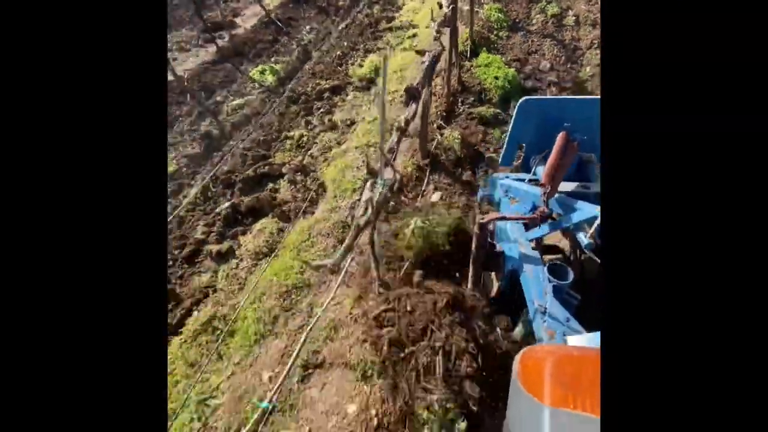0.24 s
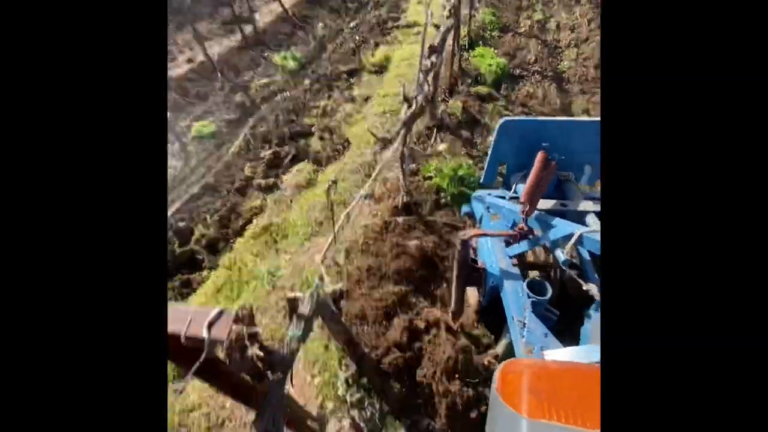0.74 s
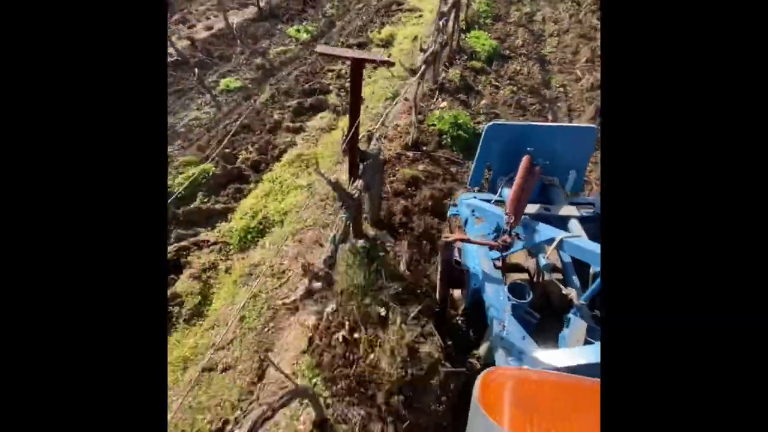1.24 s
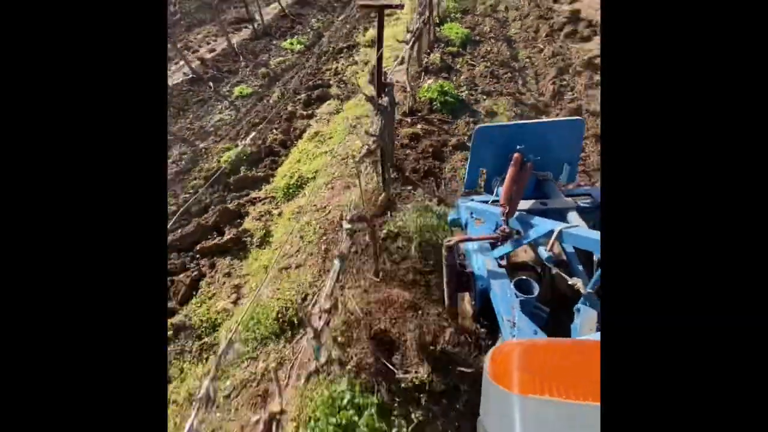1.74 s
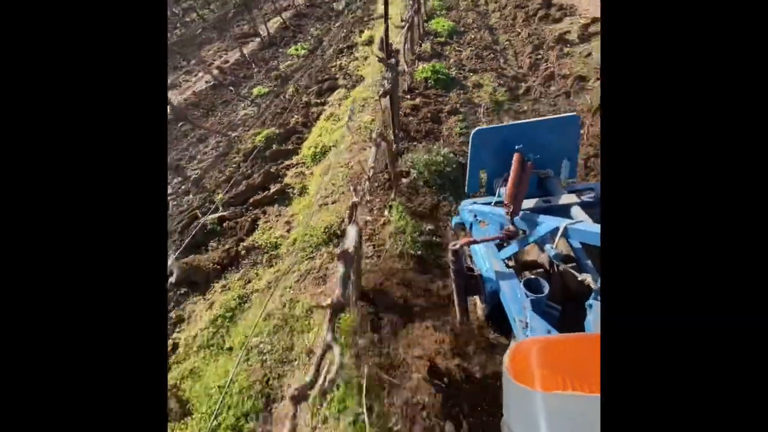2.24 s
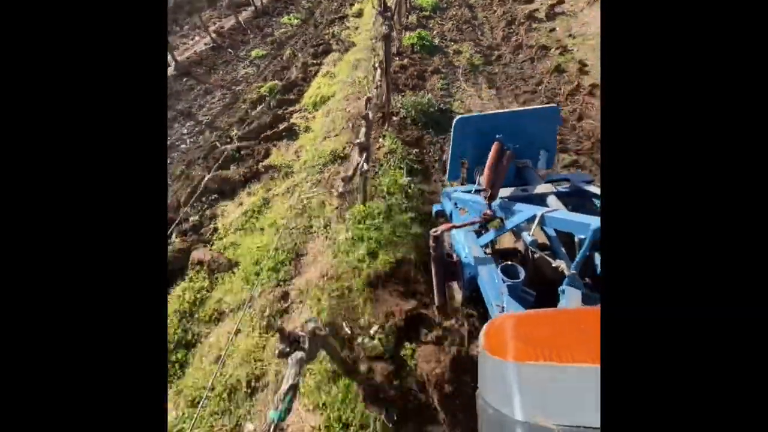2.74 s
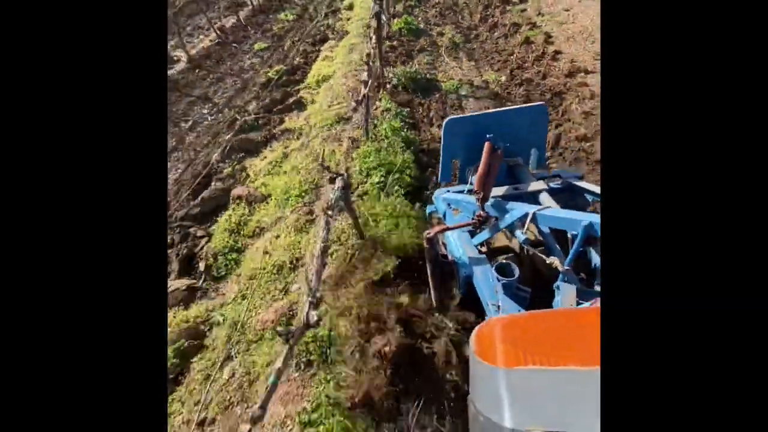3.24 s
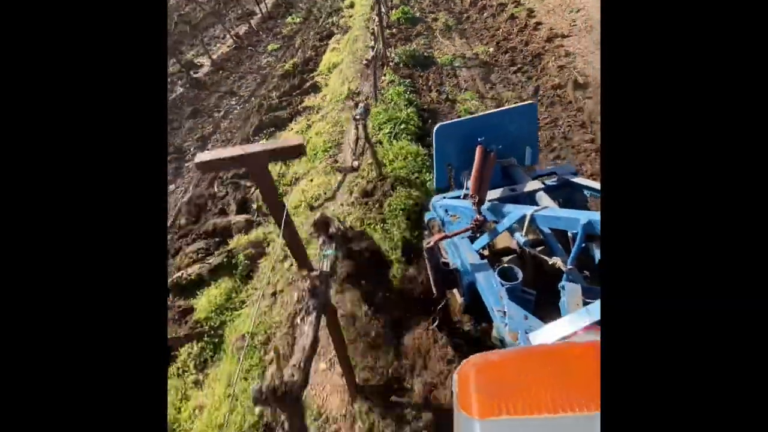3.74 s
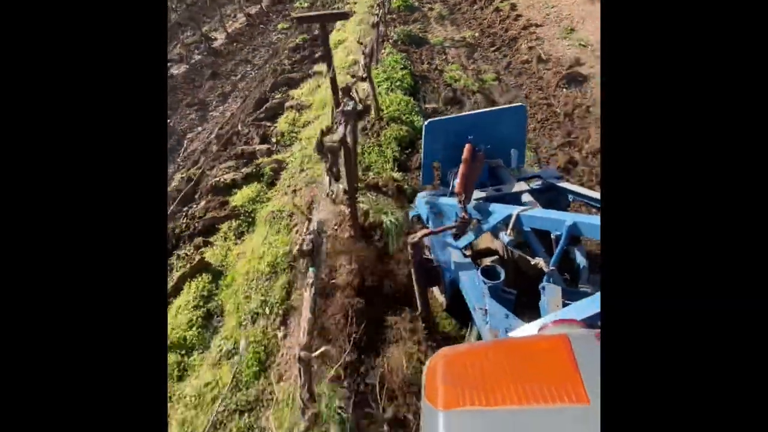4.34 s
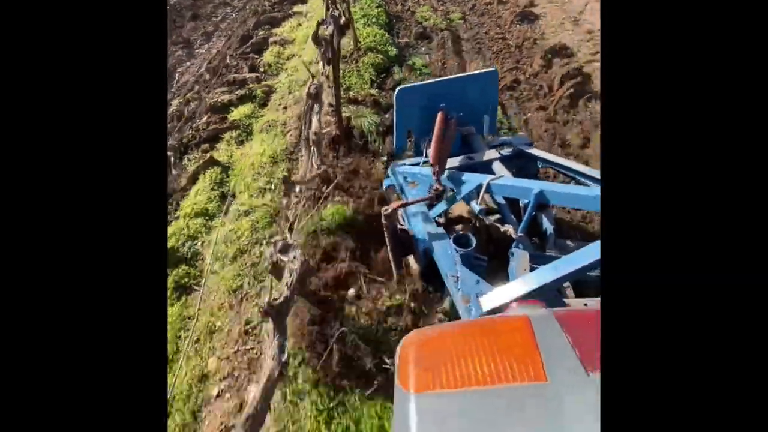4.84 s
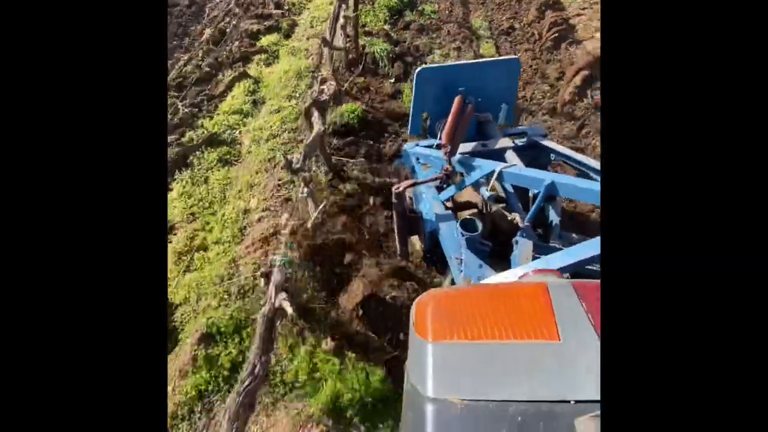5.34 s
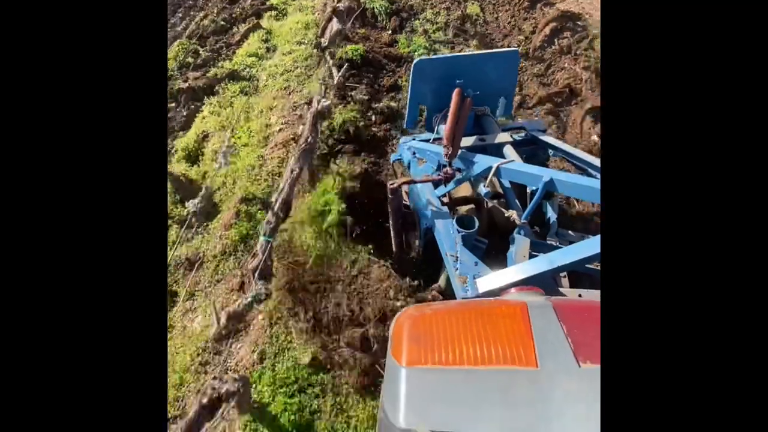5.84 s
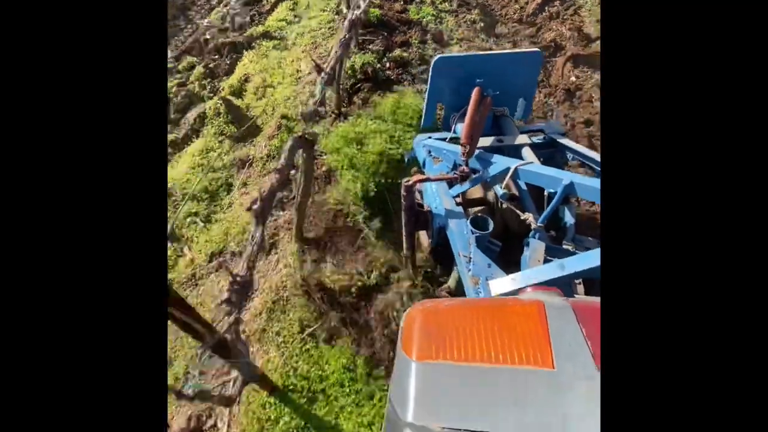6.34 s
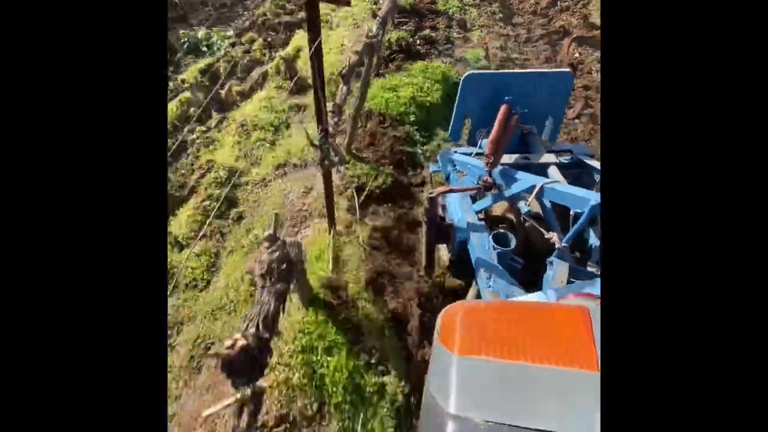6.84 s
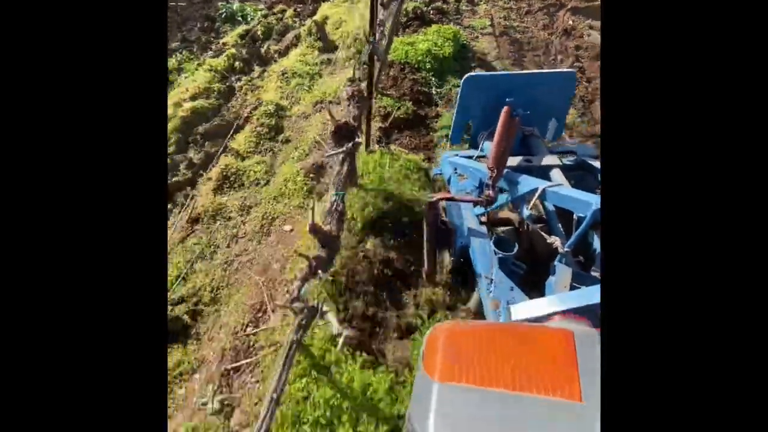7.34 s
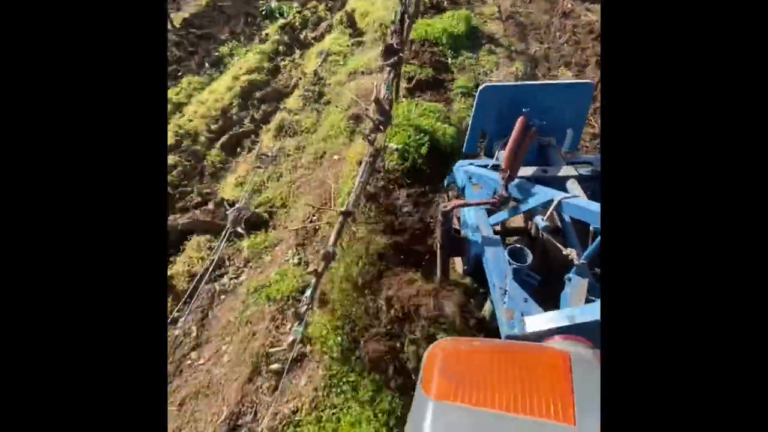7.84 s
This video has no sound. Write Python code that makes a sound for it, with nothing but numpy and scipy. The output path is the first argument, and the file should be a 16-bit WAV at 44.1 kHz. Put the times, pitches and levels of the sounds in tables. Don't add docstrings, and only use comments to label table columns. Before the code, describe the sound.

A diesel tractor engine runs at a nearly constant working speed for about eight seconds, close and loud from the seat, outdoors: a deep throbbing firing tone, exhaust rumble, bonnet roar, clatter and thin gear whine. Soil hisses softly over the discs, with scattered gritty clods throughout. Stones tap from 1.0 to 1.5 s; a low creak follows at 1.7 s. High whistles with oil spurts come at 2.0 and, sharper, 2.5 s. Small knocks and creaks cluster at 3.0 s. Around 4.0 s hard clanks meet a strong squeal, then oil sputters to about 4.5 s. Near 4.8 s the hand-held phone turns, shifting the stereo image, and the engine grows brighter and more forward. Squeaks and oil hiss return at 5.2 to 5.6 s, stones clank at 6.0 s, a faint whistle and spurt sound at 7.6 s, and bright steel knocks close at 8.0 s.

```python
import sys
import numpy as np
from scipy import signal
from scipy.fft import rfft, irfft, next_fast_len
from scipy.io import wavfile
from scipy.ndimage import uniform_filter1d, map_coordinates

SR = 44100
rng = np.random.default_rng(int(sys.argv[2]) if len(sys.argv) > 2 else 0)


def digitize_waveform(pressure):
    field = np.atleast_2d(pressure).T
    bounded = np.clip(field, -1, 1)
    quanta = np.round(bounded * 32767).astype(np.int16)
    wavfile.write(sys.argv[1], SR, quanta)


def gain_from_db(level_db):
    decades = np.asarray(level_db, float) / 20
    return 10 ** decades


N = 356006

# (time [s], frequency [Hz])
SHAFT_HZ = [(0.0, 21.48), (0.5, 21.48), (1.15, 21.42), (1.5, 21.54), (2.0, 21.47), (3.0, 21.37),
            (3.25, 21.27), (3.5, 21.43), (3.75, 21.47), (4.1, 21.34), (4.5, 21.41), (4.75, 21.64),
            (5.4, 21.82), (5.75, 21.71), (6.9, 21.72), (7.4, 21.86), (7.75, 21.84), (8.07, 21.72)]
# (multiple of shaft line [1], level [dB])
ORDER_LEVELS_DB = [(2, -17), (3, 1), (4, -14), (5, -18), (6, -12.5), (7, -9), (8, -19), (9, -15), (10, -20),
                   (11, -24), (12, -12.5), (13, -20), (15, -14), (16, -26), (17, -22), (18, -16), (19, -23),
                   (21, -18), (24, -19), (25, -21), (26, -15.5), (27, -21), (30, -13.5), (32, -24),
                   (33, -27), (36, -28), (38, -23), (39, -27), (42, -27), (44, -28), (45, -20), (52, -27),
                   (60, -23.5)]
# (multiple of shaft line [1], level [dB])
GEAR_LEVELS_DB = [(14.3, -20), (75, -28.5), (84, -29), (90, -23.5), (119.5, -31)]
# (level [dB], gain when faced [dB], gain under load [dB], gain just after the turn [dB])
LAYERS_DB = [
    (-18.5, 1.1, -2, 2),
    (-23.5, 0, 0.73, 0.5),
    (-23.5, 1.03, 1.36, 4.5),
    (-30.5, 3.5, -0.93, 2.5),
]
# (time [s], share [0-1])
DISC_LOAD = [(0, 0.5), (1.0, 0.1), (2.2, 0.78), (3.0, 1), (4.0, 0.16), (8.07, 0.56)]
# (time [s], share [0-1])
FACING = [(0, 0.3), (3.5, 0.4), (4.5, 0.43), (5.0, 0.14), (6.0, 1), (7.0, 0.77), (8.07, 1)]
# (time [s], extra lead near 600 Hz [rad])
WRIST_SWING_RAD = [(4.8, -0.91), (5.35, -0.05), (5.7, 0.25), (7, 0.42), (8.07, 0.78)]
# (frequency [Hz], density [dB per Hz])
RUMBLE_DB = [(25, -52), (45, -17), (80, -8), (140, -5.5), (250, -10), (330, -30), (600, -50)]
# (frequency [Hz], density [dB per Hz])
BODY_DB = [(150, -62), (290, -0.5), (560, 0.5), (700, -3), (950, -3), (1100, -15), (2000, -85)]
# (frequency [Hz], density [dB per Hz])
CLATTER_DB = [(600, -33), (1050, 1), (1300, 2), (1900, 0.5), (2400, -4.5), (3500, -9.5), (4300, -14.5),
              (7400, -46), (12000, -33)]
# (time [s], length [s], level [dB], steel pitch [Hz], share that rings [0-1])
STONES = [(0.52, 0.0043, -31, 3850, 0.3), (1.006, 0.014, -21.5, 1900, 0.4),
          (1.052, .005, -17.5, 1435, 0.37), (1.233, .0031, -21, 1910, 0.1),
          (1.427, 0.0085, -17, 1800, 0.27), (1.487, 0.0038, -22, 3300, 0.36),
          (2.236, 0.012, -19.5, 3300, 0.2), (3.016, .008, -22, 2800, 0.5), (3.049, .012, -20.5, 3260, 0.24),
          (3.062, .008, -21, 2980, 0.36), (3.9815, 0.0023, -11.5, 2254, 1), (3.982, 0.00194, -21, 2780, .8),
          (3.98, 0.0021, -10, 1400, 0.35), (4.098, .003, -17, 2230, 0.5), (4.124, .008, -22, 2280, 0.7),
          (4.137, 0.00415, -21, 2670, 0.7), (4.148, .003, -16, 2340, 0.6), (4.775, 0.0046, -18, 2210, 0.2),
          (4.786, 0.0059, -20, 1940, 0.26), (4.793, 0.0055, -15.5, 4000, 0.1),
          (4.919, 0.0046, -18.5, 1590, .45), (5.226, 0.002, -24, 1900, 0.1), (5.905, 0.014, -22, 1957, 0.6),
          (6.001, 0.0011, -14.5, 1570, 0.6), (6.045, .004, -26, 1850, .3),
          (6.053, 0.0069, -12.5, 2000, 0.74), (6.049, .004, -16, 4200, 0.47), (6.054, .004, -19, 3740, .6),
          (6.049, 0.0041, -17, 6230, 0.5), (6.097, 0.0066, -19, 1940, 0.5), (6.219, 0.0044, -26, 4000, .1),
          (6.662, 0.0054, -22.5, 1310, 0.63), (7.128, .004, -18, 1486, 0.35),
          (7.293, 0.0085, -26, 1880, 0.9), (7.342, .005, -20, 1323, 0.4), (7.489, .013, -20, 1640, 0.37),
          (7.988, .004, -24, 3800, 0.1), (8.009, .003, -25, 3400, .2), (8.015, .003, -19, 1480, .7),
          (8.017, 0.002, -10, 3850, 0.3), (8.019, 0.0053, -8, 3480, 0.84)]
# (time [s], length [s], level [dB])
CLODS = [(0.157, 0.0032, -23), (0.282, 0.0038, -27.5), (0.366, 0.0078, -31), (0.52, 0.0039, -25.5),
         (0.687, 0.0032, -32), (0.816, 0.0042, -25), (1.202, 0.0033, -31), (1.228, .0015, -28),
         (1.243, 0.004, -27.5), (1.443, 0.0026, -36), (1.832, 0.003, -24.5), (1.998, 0.0075, -33),
         (2.063, 0.0073, -38), (2.162, 0.005, -30), (2.386, 0.0034, -41), (2.52, 0.0083, -26),
         (2.543, .015, -36), (3.018, 0.0061, -34), (3.037, 0.002, -25), (3.744, 0.009, -29.5),
         (4.034, 0.0027, -27), (4.117, 0.022, -33), (4.351, 0.012, -32), (4.553, .003, -29),
         (4.791, 0.012, -35), (4.994, 0.0029, -30), (5.335, .012, -33), (5.391, 0.0071, -25.5),
         (5.468, 0.0062, -31), (5.55, .0045, -31), (6.097, 0.0025, -22.5), (6.587, 0.004, -33),
         (7.34, 0.0073, -35), (7.475, 0.0068, -34), (7.49, .005, -36), (7.544, .002, -29),
         (8.016, 0.015, -25.5)]
# (frequency [Hz], density [dB per Hz])
GRIT_DB = [(2500, -25), (4500, 0), (9000, -1), (13000, -3), (15800, -7)]
# (centre [s], length [s], pitch [Hz], level [dB], overtone [dB])
WHISTLES = [(2.009, 0.016, 5010, -29, 2), (2.028, .035, 4800, -29, -4), (2.071, 0.022, 4720, -18, -14),
            (2.09, .015, 4750, -37, -20), (2.511, 0.02, 4800, -12.5, -9), (2.546, .012, 4670, -23, -12),
            (2.565, .02, 4660, -37, -15), (4.273, 0.023, 5050, -25, -8), (4.303, 0.03, 4980, -30, -14),
            (4.33, 0.021, 5010, -29, -18), (4.38, .02, 4980, -36, -15), (5.203, 0.025, 5030, -28, -1),
            (5.228, .018, 4920, -23, -3), (5.248, .02, 4940, -36, -12), (7.568, 0.022, 4880, -29, -8),
            (7.586, 0.016, 4760, -25, -3)]
# (centre [s], length [s], pitch [Hz], level [dB], overtone [dB])
SQUEALS = [(0.886, 0.015, 3880, -22.5, -3), (0.915, 0.019, 3850, -25, -16), (2.258, 0.025, 3930, -34, -2),
           (2.314, .06, 3920, -40, -14), (3.794, 0.022, 3870, -29, -4), (3.824, 0.02, 3900, -25.5, -11),
           (4.03, 0.024, 3870, -13.5, -14), (4.02, 0.059, 3830, -23, -9), (4.904, .07, 3920, -42, -6),
           (5.53, .016, 3900, -29, 0), (5.549, 0.035, 3863, -20.5, -2), (5.561, 0.033, 3870, -27, 12),
           (5.586, 0.025, 3864, -17, -8), (5.615, 0.022, 3850, -36, -12), (7.792, 0.04, 3880, -36.5, 3)]
# (centre [s], length [s], pitch
# [Hz], level [dB], overtone [dB])
CREAKS = [(1.675, .02, 1630, -26, -25), (1.691, 0.029, 1587, -15.5, -12.5), (1.7166, 0.015, 1550, -15, -19),
          (1.732, 0.009, 1560, -22.5, -23), (3.994, 0.019, 2280, -20, -22), (5.2, 0.034, 1345, -31, -25),
          (5.229, 0.014, 1365, -19.5, -25), (3.018, 0.012, 3110, -27, -1), (3.042, 0.011, 3250, -26, 3),
          (3.051, 0.006, 3020, -17.5, 1.5), (3.064, .014, 3530, -26, -8)]
# (start [s], length [s], start level [dB], end level [dB], orifice hum [dB])
OIL_STROKES = [(0.787, .1, -53, -51, -7), (1.199, 0.07, -46, -48, 9), (2.058, 0.11, -32, -43, -5),
               (2.501, 0.043, -35, -49, -10), (3.018, 0.054, -49, -50, 9), (3.79, 0.12, -37, -58, -17),
               (4.092, 0.11, -41, -38, -9), (4.304, 0.049, -26.5, -51, -15), (4.345, 0.027, -21, -28, -21),
               (4.379, 0.15, -27, -37.5, -9), (4.66, 0.19, -47, -39, -11), (5.19, .05, -56, -44, 8),
               (5.261, 0.024, -27, -38, -2), (5.294, 0.12, -32, -37, -4), (5.417, 0.05, -39, -39, -5),
               (5.466, .09, -33, -47, -4), (7.581, 0.21, -30.5, -52, -4)]
# (centre [Hz], width [Hz], level [dB])
VALVE_MODES = [(5000, 250, -7), (6900, 300, -2), (7450, 200, 2), (9350, 300, -7), (10900, 1500, -9),
               (12600, 900, 1), (14300, 1500, 1)]
# (frequency [Hz], density [dB per Hz])
SOIL_DB = [(3000, -25), (4500, -1), (7500, 0), (8300, -3), (10000, -3), (13000, -6), (15700, -12)]
# (time [s], level [dB])
SOIL_SLIDE_DB = [(0.0, -34), (0.6, -38.5), (1.5, -38), (2.4, -42.5), (2.7, -40), (3.0, -42.5), (3.6, -41.5),
                 (3.9, -37.5), (4.3, -37.5), (4.9, -39.5), (6.0, -40), (6.3, -43.5), (7.0, -38.5),
                 (7.5, -41.5), (7.8, -37.5), (8.07, -41.5)]
# (frequency [Hz], lead [rad])
PORT_LEAD_RAD = [
    [(0, 0.12), (340, 0.03), (690, -1.5), (1980, 0), (2670, 1.1), (3530, 3.6), (5080, 3.3), (6030, 1.95), (6980, 2.1), (8350, 2.8), (12000, 3.02), (13500, 3.7), (15200, 5.9), (16300, 6.2)],
    [(0, 0), (170, -.4), (350, -1.3), (560, -2.5), (900, -2.9), (1400, -3.5), (1545, -3.8), (1555, 2.48), (1980, 1.58), (2600, 2.88), (3880, 1.98), (4910, 2.78), (5940, 1.68), (7490, 2.18), (8350, 3.08), (13200, 3.28), (13700, 3.58), (14000, 4.58), (15200, 6.08)],
    [(800, -.5), (1570, .4), (2100, 1.7), (3500, 1.9), (3870, 1.1), (4900, 1.2), (7700, 2.2), (9300, 3.14)],
]
# (frequency [Hz], left minus right [dB])
PORT_LEAN_DB = [
    [(60, 0.0), (180, 1.5), (550, 3.0), (1650, -0.5), (4970, -1.5), (15000, 0.0)],
    [(60, 0.5), (180, 0.0), (550, 0.0), (1650, 0.5), (4970, -2.5), (15000, 0.0)],
    [(1570, -1), (3870, -2), (4900, -7), (7700, 0)],
]
# (frequency [Hz], likeness [0-1])
PORT_LIKENESS = [
    [(60, .985), (250, .95), (600, .7), (1100, .35), (1900, .72), (2800, .35), (5000, .4), (7500, .7), (8500, .95), (12000, .92), (14500, .5)],
    [(60, .97), (250, .87), (700, .95), (1200, .55), (1900, .68), (2800, .72), (5000, .68), (7500, .75), (8500, .96), (12000, .91), (14500, .5)],
    [(1570, .93), (4900, .85), (7700, .95), (9300, 1)],
]

TURN_S = (4.72, 4.88)
LINE_STEP = 8
PUMP_ORDER, PUMP_LOAD_DB = 30, 4
FACED_ORDERS, FACED_DB = (52, 60, 75), 10
STONE_GRIT_DB, CLOD_THUD_DB = -24, 4
CLOD_RING_SHARE, RING_T60_S = .12, .021
CRUMB_S, CRUMB_DB, CRUMB_SPREAD_DB = .005, -39, 2
OPEN_HZ, SAG_PER_S = 5240, 9.2
SQUEAL_GLIDE_HZ, CREAK_GLIDE_HZ = -12, -30
ORIFICE_HZ, ORIFICE_WIDTH_HZ = 6050, 170


def unit(x):
    return x / np.sqrt(np.mean(x ** 2) + 1e-20)


def along(points, hz):
    f, v = np.transpose(points)
    return np.interp(np.log(hz + 1), np.log(f + 1), v)


def curve(rows, step=1):
    s, v = np.transpose(rows)
    return np.interp(np.arange(0, N, step) / SR, s, v)


def wobble(rate_hz, step=1):
    knots = rng.standard_normal(400)
    coarse = map_coordinates(knots, [np.arange(0, N + 256, 256) * rate_hz / SR])
    return np.interp(np.arange(0, N, step) / 256, np.arange(len(coarse)), coarse)


def filtered(x, response):
    m = next_fast_len(N + 8192)
    return irfft(rfft(x, m) * response(np.fft.rfftfreq(m, 1 / SR)), m)[..., :N]


def resonance(hz, centre_hz, width_hz):
    damping = 1j * hz * width_hz
    return damping / (centre_hz ** 2 - hz ** 2 + damping)


def rush(spectrum, patchy_db):
    z = signal.stft(rng.standard_normal((2, N + 512)), nperseg=512)[2]
    field = uniform_filter1d(rng.standard_normal(z.shape[1:]), size=5, axis=0)
    field = uniform_filter1d(field, size=8, axis=1)
    pair = signal.istft(z * gain_from_db(patchy_db * unit(field)), nperseg=512)[1][:, :N]
    return unit(filtered(pair, lambda hz: gain_from_db(along(spectrum, hz))))


def scattered(x, t60_s):
    t = np.arange(SR // 8) / SR
    tail = rng.standard_normal(len(t)) * gain_from_db(-60 * t / t60_s)
    return np.array([x, signal.fftconvolve(x, tail / np.linalg.norm(tail))[:N]])


def layer_levels(step=1):
    t = np.arange(0, N, step) / SR
    turned = np.interp(t, (TURN_S[0] - .05, TURN_S[1] + .15), (0, 1))
    just_turned = turned * (1 - curve(WRIST_SWING_RAD, step)) / 1.6
    facing, load = curve(FACING, step), curve(DISC_LOAD, step)
    return [db + faced_db * facing + load_db * load + turn_db * just_turned
            for db, faced_db, load_db, turn_db in LAYERS_DB]


def engine_lines():
    step = LINE_STEP
    firing_db, rumble_db, body_db, clatter_db = layer_levels(step)
    turns = np.cumsum(curve(SHAFT_HZ, step)) * step / SR
    load, facing, out = curve(DISC_LOAD, step), curve(FACING, step), 0
    for order, db in ORDER_LEVELS_DB + GEAR_LEVELS_DB:
        if order < 4.5:
            band_db = firing_db
        elif order < 14:
            band_db = rumble_db + 5
        elif order < 47:
            band_db = body_db + 5
        else:
            band_db = clatter_db + 11
        unrest = min((order / 6) ** 2, 1)
        flutter_db = (.8 + 1.2 * unrest) * wobble(9, step) + 1.3 * unrest * wobble(2, step)
        if order == PUMP_ORDER:
            flutter_db += PUMP_LOAD_DB * (load - .4)
        if order in FACED_ORDERS:
            flutter_db += FACED_DB * (facing - .4)
        drift = .4 * unrest * wobble(7, step)
        if order < 8:
            drift = drift - [[np.pi / 2], [np.pi]]
        else:
            drift = drift + rng.uniform(0, 2 * np.pi, (2, 1))
            drift[1] += 2.5 * wobble(1.5, step)
        out = out + gain_from_db(db + band_db + 0.5 + flutter_db) * np.sin(2 * np.pi * order * turns + drift)
    return signal.resample_poly(out, step, 1, axis=1)[:, :N]


def engine_roar():
    _, rumble_db, body_db, clatter_db = layer_levels()
    firing = np.cos(2 * np.pi * 3 * np.cumsum(curve(SHAFT_HZ)) / SR)
    rumble = gain_from_db(rumble_db - 4.8 + .6 * wobble(9.9)) * rush(RUMBLE_DB, patchy_db=.8)
    body = gain_from_db(body_db - 3.6 + 1.2 * firing) * rush(BODY_DB, patchy_db=1.1)
    clatter_db = clatter_db - 1.2 + 1.3 * firing + .7 * wobble(12)
    return rumble + body + gain_from_db(clatter_db) * rush(CLATTER_DB, patchy_db=1.8)


def disc_knocks():
    steel, grit_gain = np.zeros(N + SR), np.zeros(N + SR)
    t = np.arange(SR // 16) / SR
    crumbs = [(u * N / SR, CRUMB_S * (.5 + v), CRUMB_DB + CRUMB_SPREAD_DB * (2 * w - 1))
              for u, v, w in rng.random(size=(16, 3))]
    blows = [(s, length, db, db + STONE_GRIT_DB, hz, share) for s, length, db, hz, share in STONES]
    blows += [(s, length, db + CLOD_THUD_DB, db, rng.uniform(1150, 3800), CLOD_RING_SHARE)
              for s, length, db in CLODS + crumbs]
    decay = gain_from_db(-60 * t / RING_T60_S)
    for s, length, steel_db, grit_db, hz, share in blows:
        swell = (t / length * np.exp(1 - t / length)) ** 3.2
        burst = swell * rng.standard_normal(len(t))
        modes = np.sin(2 * np.pi * hz * t) + .16 * np.sin(2 * np.pi * 1.23 * hz * t)
        ring = signal.fftconvolve(swell + burst, decay)[:len(t)] * modes
        blow = share * ring / np.abs(ring).max() + (1 - share) * burst
        start = max(int((s - 0.79 * length) * SR), 0)
        steel[start:][:len(t)] += gain_from_db(steel_db + 3.5) * blow
        grit_gain[start:][:len(t)] += gain_from_db(grit_db + 2.5) * swell
    dull = filtered(steel[:N], lambda hz: (hz > 1000) / (1 + (hz / 5000) ** 4))
    return scattered(dull, RING_T60_S), grit_gain[:N] * rush(GRIT_DB, patchy_db=1.0)


def arm_squeaks():
    out = np.zeros(N)
    rough = gain_from_db(1.4 * filtered(rng.standard_normal(N), lambda hz: (hz < 160) * 14.0))
    events = [(*row, SAG_PER_S * (row[2] - OPEN_HZ) * row[1]) for row in WHISTLES]
    events += [(*row, SQUEAL_GLIDE_HZ) for row in SQUEALS]
    events += [(*row, CREAK_GLIDE_HZ) for row in CREAKS]
    for s, length, hz, db, over_db, glide_hz in events:
        u = np.linspace(-2, 2, int(2 * length * SR))
        phase = 2 * np.pi * np.cumsum(hz + glide_hz * u / 2) / SR
        phase -= phase[len(u) // 2]
        tone = np.sin(phase) + gain_from_db(over_db - 4) * np.sin(2 * phase)
        if hz < 4000:
            tone += gain_from_db(over_db - 15) * np.sin(3 * phase)
        if 1500 < hz < 2000:
            tone += gain_from_db(-9.5) * np.sin(phase / 2)
            tone += gain_from_db(over_db + 5 - 9 * u ** 2) * np.sin(phase * 3 / 2)
            tone += gain_from_db(over_db - 11 - 12 * u ** 2) * np.sin(phase * 5 / 2)
        out[int((s - length) * SR):][:len(u)] += gain_from_db(db + 0.5 - 7.4 * u ** 2) * tone
    return scattered(out * rough, t60_s=.025) * [[1], [.7]]


def valve_oil():
    t, flow, hum = np.arange(N) / SR, np.zeros(N), np.zeros(N)
    for s, length, start_db, end_db, hum_db in OIL_STROKES:
        knots_s = (s - .012, s, s + length, s + length + 0.0075)
        stroke = gain_from_db(np.interp(t, knots_s, (-90, start_db, end_db, -70), -200, -200))
        flow += stroke
        hum += gain_from_db(hum_db) * stroke

    def valve_response(hz):
        return sum((-1) ** k * gain_from_db(db) * resonance(hz, centre_hz, width_hz)
                   for k, (centre_hz, width_hz, db) in enumerate(VALVE_MODES))

    valve = unit(filtered(rush(SOIL_DB, patchy_db=1.5), valve_response))
    valve = unit(valve + .55 * rush(GRIT_DB, patchy_db=3.5))
    orifice = unit(filtered(rush(SOIL_DB, patchy_db=.8),
                            lambda hz: resonance(hz, ORIFICE_HZ, ORIFICE_WIDTH_HZ)))
    flicker = unit(filtered(rng.standard_normal(N), lambda hz: hz < 250))
    sputter = gain_from_db(2.5 * wobble(45) + 1.8 * flicker)
    return flow * sputter * valve + hum * sputter ** .8 * orifice


def soil_slide():
    soil_db = curve(SOIL_SLIDE_DB) + 1.3 * wobble(14) + 1.1 * wobble(37)
    return gain_from_db(soil_db) * rush(SOIL_DB, patchy_db=1.2)


def ports(pair, pose, swing_rad=0):
    m = next_fast_len(N + 8192)
    hz = np.fft.rfftfreq(m, 1 / SR)
    share = np.arccos(np.clip(along(PORT_LIKENESS[pose], hz), 0, 1)) / 2
    direct, diffuse = rfft(pair, m) * [np.cos(share), np.sin(share)]
    lead = np.interp(hz, *np.transpose(PORT_LEAD_RAD[pose]))
    lead = lead + swing_rad * hz / 600 * np.exp(1 - hz / 600)
    half = gain_from_db(along(PORT_LEAN_DB[pose], hz) / 2) * np.exp(.5j * lead)
    return irfft(np.array([(direct + diffuse) * half, (direct - diffuse) / half]), m)[:, :N]


def scene():
    steel, grit = disc_knocks()
    pair = engine_lines() + engine_roar() + valve_oil() + soil_slide() + grit
    turned = np.interp(np.arange(N) / SR, TURN_S, (0, np.pi / 2))
    back = np.clip((curve(WRIST_SWING_RAD) + .7) / 1.7, 0, 1)
    before = ports(pair, pose=0)
    after = (1 - back) * ports(pair, pose=1, swing_rad=-.7) + back * ports(pair, pose=1, swing_rad=1)
    arm_side = ports(arm_squeaks() + steel, pose=2)
    return np.cos(turned) ** 1.7 * before + np.sin(turned) ** 1.7 * after + arm_side


def low_pass(x):
    return signal.sosfilt(signal.butter(12, 16690, fs=SR, output="sos"), x)


def record(dry):
    level = dry / (1 + np.abs(dry / .95) ** 6) ** (1 / 6)
    mix = filtered(level, lambda hz: hz < 15950)
    return low_pass(mix)


dry = scene()
out = record(dry)
digitize_waveform(out)
```